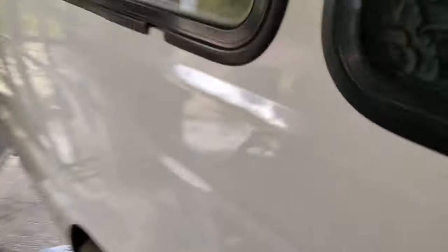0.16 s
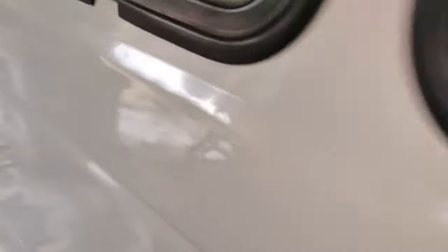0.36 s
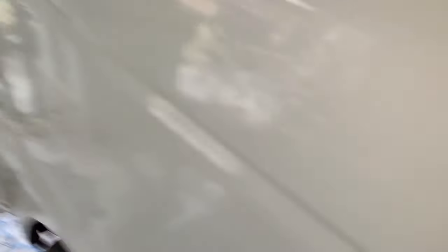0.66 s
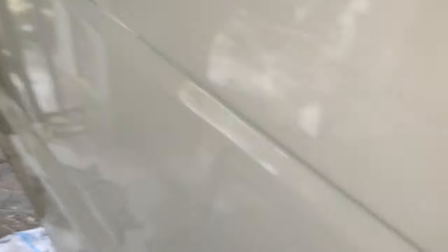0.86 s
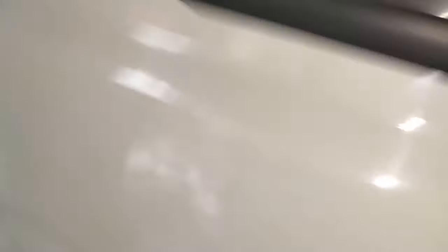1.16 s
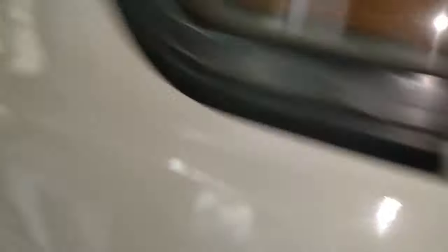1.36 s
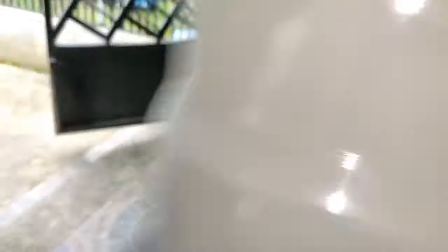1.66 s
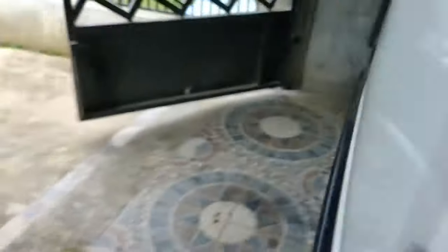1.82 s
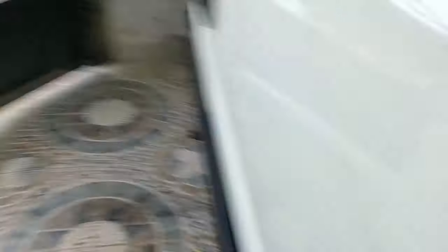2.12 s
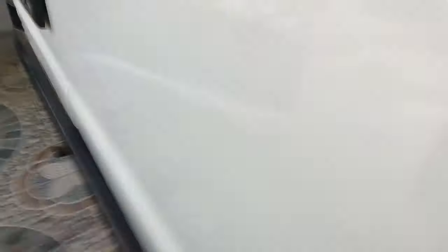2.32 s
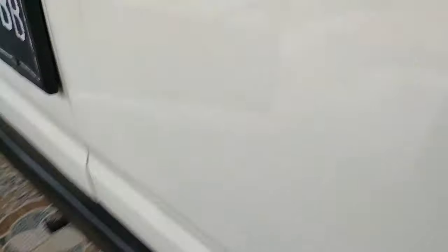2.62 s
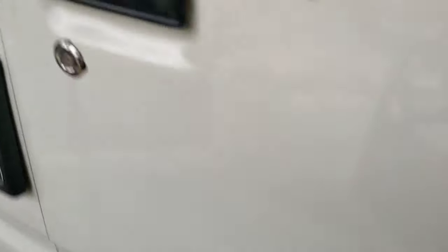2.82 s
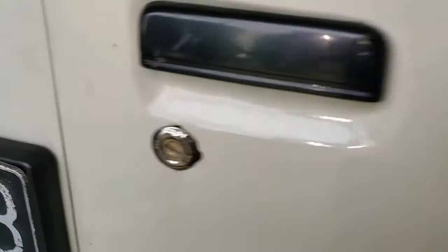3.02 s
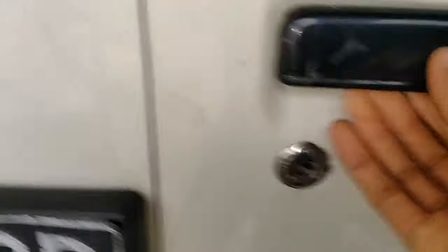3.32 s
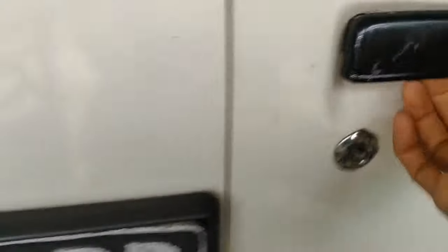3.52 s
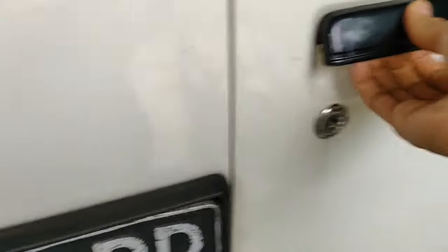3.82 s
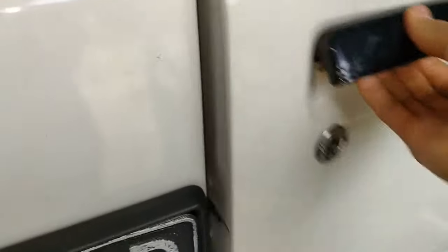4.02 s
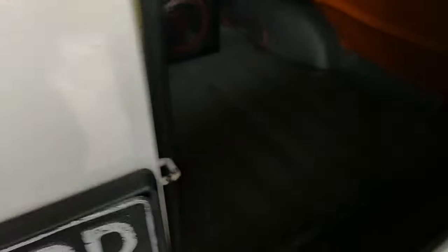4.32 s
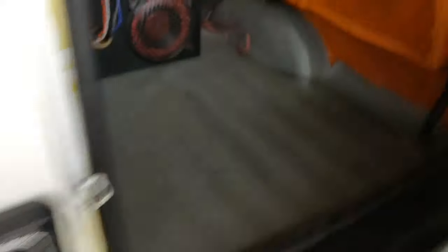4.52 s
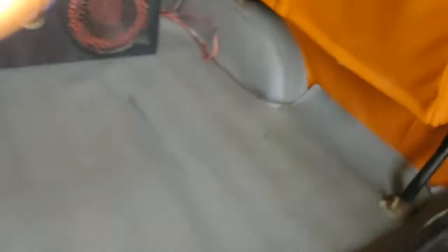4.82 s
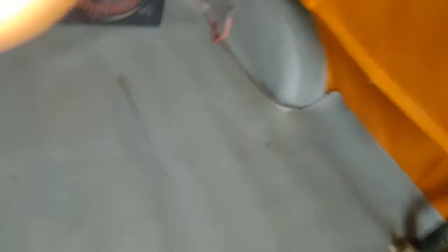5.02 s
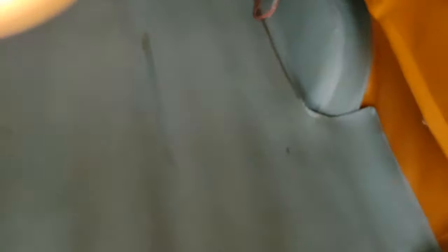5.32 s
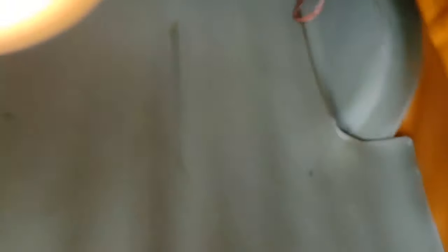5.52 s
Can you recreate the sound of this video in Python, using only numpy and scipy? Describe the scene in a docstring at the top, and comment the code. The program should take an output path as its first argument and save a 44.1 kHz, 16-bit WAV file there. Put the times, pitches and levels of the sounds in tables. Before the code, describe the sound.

A van door swings and slams in a carport, its lock clattering and its metal panel booming. Soft footsteps scuff along while fingers tap the hand-held microphone. The rear hatch handle rattles, the latch lets go with a very loud, close clack, and the hatch rises with a faint rub and a knock. An insect chirps faintly over a low outdoor hum.

```python
"""Over a low outdoor hum and a chirping insect, a van door swings and slams in a tiled carport:
the lock clatters, the steel skin booms and a loose panel shudders. Someone scuffs round to the rear
with a hand-held camera, fingers tapping its shell. The hatch handle rattles, then the latch lets go
close enough to overload the microphone. A finger judders on the shell while the hatch slides up
on its rubbing strut and knocks against its stop."""
import sys
import numpy as np
from scipy import signal
from scipy.fft import irfft, next_fast_len
from scipy.io import wavfile
from scipy.ndimage import uniform_filter1d, minimum_filter1d

SR = 44100
rng = np.random.default_rng(int(sys.argv[2]) if len(sys.argv) > 2 else 0)


def output_pcm(signal):
    """Save a mono or channel-first signal as 16-bit PCM at the path in sys.argv[1].

    Samples are clipped to [-1, 1] before scaling.
    """
    pcm = np.clip(np.atleast_2d(signal).T, -1, 1) * 32767
    wavfile.write(sys.argv[1], SR, np.round(pcm).astype(np.int16))


N = 249958
TIME = np.arange(N) / SR
CORNER_S = 2.18  # the camera is halfway round the rear corner of the van

# noise colours, dark to bright: (frequency [Hz], level [dB])
HUM = [(25, -36), (50, -23.5), (90, -10.5), (140, 1), (200, -3.5), (300, -6.5), (420, -13), (700, -52.5)]
WASH = [(180, -23), (320, 4), (480, 2.5), (680, -3.5), (900, -5), (1300, -23), (2500, -39)]
AIR = [(500, -15.5), (1000, 7.5), (1400, -1.5), (2100, 1), (3000, -4), (4600, -8), (6000, -4), (8000, -10)]
HISS = [(4500, -37.5), (6000, -15), (6700, 3), (7200, 5), (7700, -4), (8300, -29.5)]
# the bright tick of a light contact: (frequency [Hz], level [dB], t60 [s])
TAP_TICK = [(1140, -8.5, 0.0045), (2210, -14.5, 0.0046), (4200, -11.5, 0.0026), (7500, 1.5, 0.0032)]


def amp(db):
    """Decibels to gain."""
    return 10 ** (np.asarray(db) / 20)


def unit_rms(x):
    """Scales to rms 1."""
    return x / np.sqrt(np.mean(x ** 2) + 1e-20)


def curve(points, hz):
    """Interpolates (frequency [Hz], value) points on a log-frequency axis."""
    f, value = np.transpose(points)
    return np.interp(np.log(hz + 1), np.log(f + 1), value)


def panned(db):
    """Constant-power stereo gains; positive dB leans left."""
    return unit_rms(amp([[db / 2], [-db / 2]]))


def add(mix, s, sound):
    """Adds a sound to the mix at time s."""
    part = mix[:, round(s * SR):][:, :sound.shape[-1]]
    part += sound[..., :part.shape[1]]


def wander(samples):
    """Random drift of rms 1, smoothed over this many samples."""
    return unit_rms(uniform_filter1d(rng.standard_normal(N), size=samples))


def strokes(rows, attack, release):
    """Envelope for (time [s], length [s], level [dB]) rows: each rises, holds and dies away."""
    return sum(amp(db) * np.clip((TIME - s) / attack, 0, 1)
               * np.exp(-np.maximum(TIME - s - length, 0) / release) for s, length, db in rows)


def soften(x, rise):
    """Rounds off an attack, as when vibration spreads over a panel."""
    return x * (1 - np.exp(-np.arange(x.shape[-1]) / SR / rise))


def stereo_spectra(size):
    """Noise spectra for two microphones, alike in the bass and nearly unrelated in the treble."""
    # likeness of the two sides: (frequency [Hz], correlation [0-1])
    likeness = [(100, 1), (400, 0.75), (750, 0.36), (1200, 0.047), (3000, 0.033), (8000, 0.12)]
    hz = np.fft.rfftfreq(size, 1 / SR)
    mid, side = np.exp(2j * np.pi * rng.random((2, len(hz))))
    same = curve(likeness, hz)
    mid, side = mid * np.sqrt(1 + same), side * np.sqrt(1 - same)
    return hz, np.array([mid + side, mid - side])


def noise(colour):
    """Steady stereo noise of a given colour."""
    hz, spectra = stereo_spectra(next_fast_len(N, True))
    return unit_rms(irfft(spectra * amp(curve(colour, hz)))[:, :N])


def resonant(peaks):
    """Steady stereo noise in a few resonances."""
    hz, spectra = stereo_spectra(next_fast_len(N, True))
    shape = sum(amp(db) / (1 + ((hz - centre) / width) ** 2) for centre, width, db in peaks)
    return unit_rms(irfft(spectra * shape)[:, :N])


def bands(rows, size):
    """Overlapping bands of noise, each dying at its own speed."""
    hz, spectra = stereo_spectra(size)
    t = np.arange(size) / SR
    edges = np.log([rows[0][0] / 2] + [row[0] for row in rows] + [rows[-1][0] * np.sqrt(2)])
    for k, (_, db, t60) in enumerate(rows):
        share = np.interp(np.log(hz + 1), edges[k:k + 3], [0, 1, 0])
        yield db, unit_rms(irfft(spectra * share)) * np.exp(-np.log(1000) * t / t60)


def burst(rows, size=32768):
    """A blow on something with too many modes to tell apart."""
    return sum(amp(db) * band for db, band in bands(rows, size))


def ring(modes, size=32768):
    """A blow on a few distinct modes."""
    t = np.arange(size) / SR
    return sum((-1) ** k * amp(db) * np.exp(-np.log(1000) * t / t60) * np.sin(2 * np.pi * hz * t)
               for k, (hz, db, t60) in enumerate(modes))


def walk(beside_db, behind_db, open_db, corner_takes_s=0.98, open_s=4.3, open_takes_s=0.39):
    """Gain that glides from beside the van to behind it, then to the open hatch."""
    rounded = .5 + .5 * np.tanh(2 * (TIME - CORNER_S) / corner_takes_s)
    ajar = .5 + .5 * np.tanh(2 * (TIME - open_s) / open_takes_s)
    return amp(beside_db + (behind_db - beside_db) * rounded + (open_db - behind_db) * ajar)


def ambience(flicker_db=2.0):
    """Outdoor hum, wash and flickering hiss, booming in the hollows behind and inside the van."""
    # air resonances behind and inside the van: (frequency [Hz], half-width [Hz], level [dB])
    hollow_peaks = [(134, 33, 3), (179, 50, -7), (390, 25, -26.5), (615, 30, -19)]
    load_space_peaks = [(300, 12, -3), (445, 12, -3.5), (660, 47, 1)]
    flicker = amp(flicker_db * wander(2500))
    hum = noise(HUM) * walk(-55.5, -54.5, -57)
    wash = noise(WASH) * walk(-73, -60.5, -58)
    air = noise(AIR) * walk(-73.5, -75, -72)
    hiss = noise(HISS) * walk(-65, -73, -72) * flicker
    hollow = resonant(hollow_peaks) * walk(-66, -47, -49.5)
    load_space = resonant(load_space_peaks) * walk(-83.5, -67, -59)
    lean_left = walk(3.5, 0.5, 1) ** np.array([[.5], [-.5]])
    return (hum + wash + air + hiss + hollow + load_space) * lean_left


def carport(x):
    """Diffuse echo from the roof, walls and tiles."""
    # reverb bands: (frequency [Hz], energy [dB], t60 [s])
    decays = [(120, -34, 1), (388, -30, 0.31), (900, -27.5, .85), (2200, -18, 0.47), (6500, -18.5, 0.43)]
    tail = sum(amp(db) * band / np.linalg.norm(band[0]) for db, band in bands(decays, size=32768))
    return signal.oaconvolve(x, soften(tail, rise=0.0068), axes=1)[:, :N]


def insect(gap_s=.085, blur_s=.075, glide_s=0.015, top_hz=7550, bottom_hz=6850):
    """An insect chirps in bouts and trills once; a chirp is two falling whistles in a blur of echo."""
    # bouts of chirps, and the steady trill: (time [s], length [s], level [dB])
    bouts = [(0.01, .08, -60), (0.252, 0.12, -66), (0.957, 0.15, -55.5), (1.209, 0.0096, -54.5),
             (1.368, 0.23, -54.5), (1.729, 0.093, -57), (1.956, .2, -56), (2.366, .01, -60),
             (2.556, .01, -60), (4.005, .01, -65.5)]
    trills = [(3.36, .5, -59)]
    # colour of the blur: (frequency [Hz], half-width [Hz], level [dB])
    blur_peaks = [(6900, 180, -4), (7433, 100, -3)]
    chirps = [(at, db) for s, span, db in bouts
              for at in np.linspace(s, s + span, 1 + round(span / gap_s))]
    blur, whistles = np.zeros((1, N)), np.zeros((2, N))
    fade, glide = np.arange(0, 1, 1 / (blur_s * SR)), np.arange(0, 1, 1 / (glide_s * SR))
    for s, db in chirps:
        start = max(s - glide_s, 0)
        add(blur, start, amp(db) * unit_rms(np.sqrt(fade) * (1 - fade)))
        for k in range(2):
            hz = (top_hz + (bottom_hz - top_hz) * glide) * rng.uniform(.97, 1.02)
            whistle = np.sin(np.pi * glide) * np.sin(2 * np.pi * np.cumsum(hz) / SR)
            add(whistles, start + k * glide_s, amp(db - .5 - 2.6 * k) * whistle)
    trill = noise(HISS) * strokes(trills, attack=0.018, release=0.06)
    return panned(4) * (whistles + amp(-4) * resonant(blur_peaks) * blur) + trill


def footsteps():
    """Feet and clothes brush along as the camera is carried round the van."""
    # airy scuffs and soft, low footfalls: (time [s], length [s], level [dB])
    scuffs = [(0, 0.0077, -51.5), (.17, 0.14, -66.5), (.79, 0.1, -52.5), (1.257, 0.038, -66.5),
              (1.787, 0.13, -60.5), (2.02, 0.15, -61), (2.42, 0.18, -74.5), (2.99, 0.095, -61.5),
              (3.62, 0.13, -63.5)]
    footfalls = [(1.22, 0.12, -52), (2.33, 0.16, -50.5), (2.95, 0.15, -48)]
    return (panned(4) * noise(AIR) * strokes(scuffs, attack=0.0027, release=.085)
            + noise(HUM) * strokes(footfalls, attack=0.021, release=0.035))


def judder(slips_hz=112, unevenness=.3):
    """A finger sticks and slips unevenly on the camera shell beside the left microphone."""
    # finger drags: (time [s], length [s], level [dB]); a negative length starts already faded
    drags = [(4.39, 0.74, -43.5), (4.675, -0.1254, -25)]
    # what each slip shakes: (frequency [Hz], level [dB], t60 [s])
    modes = [(117, 1, 0.035), (229, -2, 0.025), (328, -8.5, 0.027)]
    turns = np.cumsum(slips_hz * np.exp(unevenness * wander(400))) / SR
    slips = np.diff(np.floor(turns), prepend=0)
    groan = unit_rms(signal.oaconvolve(slips - slips.mean(), ring(modes, size=4096))[:N])
    return panned(12) * groan * strokes(drags, attack=0.024, release=0.019)


def fingers(low_cut_hz=170, firm_tap_db=-14, octaves_per_db=0.32):
    """Damped taps and rubs on the camera shell, mostly on the right; softer taps sound lower."""
    # a sliding fingertip: (time [s], length [s], level [dB]); its colour: (frequency [Hz], level [dB])
    rubs = [(2.645, 0.04, -48.5), (2.715, 0.047, -48), (2.84, 0.092, -57.5)]
    rub_colour = [(300, -26), (1000, 3), (3000, -7.5), (5000, -8), (7300, -0.5), (8200, -4)]
    # finger taps: (time [s], thud [dB], t60 [s], tick [dB], pan [dB])
    taps = [(2.6499, -15.5, 0.005, -36.5, -36), (2.7194, -15.5, 0.0044, -36, -35),
            (2.761, -27, .008, -47, -23), (2.79, -23, 0.022, -61, -25), (2.921, -17.5, 0.0046, -47, -40),
            (3.039, -28, 0.013, -25, -18), (3.059, -22, 0.032, -40, 11), (3.066, -12.5, 0.0097, -33, -9.5),
            (3.0769, -14.5, 0.019, -60, -37), (3.0872, -15.5, 0.014, -43, -30),
            (5.247, -22.5, 0.013, -28.5, -4.5)]
    # the shell under a firm tap: (frequency [Hz], level [dB])
    shell_modes = [(565, 2), (1000, -11.5)]
    out = panned(-13.5) * noise(rub_colour) * strokes(rubs, attack=0.0051, release=0.029)
    for s, thud_db, t60, tick_db, pan_db in taps:
        pitch = 2 ** (octaves_per_db * (thud_db - firm_tap_db))
        thud = ring([(hz * pitch, db, t60) for hz, db in shell_modes], size=4096)
        add(out, s, panned(pan_db) * (amp(tick_db) * burst(TAP_TICK, size=4096) - amp(thud_db) * thud))
    return signal.sosfilt(signal.butter(2, low_cut_hz, "highpass", fs=SR, output="sos"), out)


def door_swing(moan_s=.1, moan_hz=300, rise_hz_per_s=85, waver=0.0056):
    """The door swings with a swish and a faint rising moan, pushing air ahead of it."""
    hz = (moan_hz + rise_hz_per_s * (TIME - moan_s)) * (1 + waver * wander(600))
    phase = 2 * np.pi * np.cumsum(hz) / SR
    tone = unit_rms(amp(1) * np.sin(phase) + amp(-9) * np.sin(2 * phase))
    moan = tone * strokes([(moan_s, .25, -52.5)], attack=0.01, release=.025)
    swish = noise(WASH) * strokes([(0, 0.35, -54)], attack=0.004, release=0.053)
    pushed_air = noise(HUM) * strokes([(0.368, 0.617, -46)], attack=0.069, release=.09)
    return moan + swish + pushed_air


def strut(sag_per_s=0.26, flutter_db=2.0):
    """The strut rubs unevenly as it slides out, its resonances sinking."""
    # strokes of the rod: (time [s], length [s], level [dB])
    slides = [(4.965, 0.021, -60.5), (5.15, 0.072, -58), (5.24, 0.19, -68), (5.62, 0.019, -64.5)]
    # its resonances: (frequency [Hz], half-width [Hz], level [dB])
    peaks = [(2020, 130, -1.5), (2500, 140, -10), (3500, 360, -14), (4980, 590, -14.5)]
    speed = 1 + sag_per_s * np.clip(slides[2][0] - TIME, -.5, .5)  # sinks around the third stroke
    rub = np.array([np.interp(np.cumsum(speed) % N, np.arange(N), side) for side in resonant(peaks)])
    return rub * strokes(slides, attack=0.018, release=0.034) * amp(flutter_db * wander(400))


def linkage(detune=.06):
    """Small metal parts tick and knock on the hollow hatch; their modes shift from click to click."""
    # the hand dragging the handle out: (time [s], length [s], level [dB])
    pull = [(3.37, 0.32, -52)]
    # clicks of the linkage and the rising hatch: (time [s], knock [dB], tick [dB], pan [dB])
    clicks = [(1.102, -77, -51.5, 5), (3.306, -40.5, -58, -1), (3.403, -47.5, -46, 0),
              (3.423, -33, -52, -1), (3.468, -43.5, -33.5, 0), (3.472, -22.5, -29.5, 1),
              (3.651, -36, -57.5, -1.5), (3.681, -36, -43.5, 0), (3.757, -30, -50, -1.5),
              (3.783, -47, -39, 7.5), (3.786, -29, -34.5, -1.5), (3.847, -35, -63, 0.5),
              (4.308, -40.5, -42.5, -1), (4.406, -40, -38, -1.5), (4.554, -36.5, -44, 6.5),
              (4.636, -39.5, -46.5, 1.5), (5.151, -39, -45, 3)]
    # the handle's ring, the hollow knock, the metal tick: (frequency [Hz], level [dB], t60 [s])
    handle_modes = [(303.3, -4, 0.14), (537, -6.5, 0.2), (757, -4.5, 0.081), (895, -13, 0.11),
                    (1000, -15, .08), (1780, -25, 0.05), (3240, -27.5, 0.04)]
    knock_bands = [(140, -21, 0.14), (302, -11.5, 0.053), (710, -3, 0.16), (1150, -22.5, .08),
                   (1700, -24, .08)]
    tick_bands = [(1700, -14, .06), (3220, -15.5, 0.1), (4640, -9.5, 0.021), (6900, -4.5, 0.035)]
    # each part seats and bounces once: (delay [s], level [dB])
    chatter = [(0, -1.5), (.007, -17.5)]
    out = noise(WASH) * strokes(pull, attack=.03, release=0.061)
    for s, knock_db, tick_db, pan_db in clicks:
        modes = [(hz * np.exp(detune * rng.standard_normal()), db, t60) for hz, db, t60 in handle_modes]
        knock = amp(-3.5) * burst(knock_bands, size=8192) + amp(-2) * ring(modes, size=8192)
        contact = amp(knock_db) * burst([(700, -6, 0.016), (2000, -16, 0.0068)], size=2048)
        tick = burst(tick_bands, size=2048) + amp(-1.5) * burst(TAP_TICK, size=2048)
        add(out, s, panned(pan_db) * amp(knock_db) * knock)
        for delay, db in chatter:
            add(out, s + delay, panned(pan_db) * amp(db) * (contact + amp(tick_db) * tick))
    return out


def hatch_stop():
    """The rising hatch meets its stop with a quick double knock."""
    # the knocks: (time [s], level [dB])
    blows = [(5.047, -3.5), (5.052, -1)]
    # the hatch's dense ringing and its distinct modes: (frequency [Hz], level [dB], t60 [s])
    ringing = [(139, -36, 0.22), (230, -32.5, 0.2), (560, -34, 0.15), (920, -36, 0.14), (1520, -44.5, 0.12),
               (3800, -50.5, 0.16), (7200, -43, 0.34)]
    modes = [(205, -32.5, 0.37), (230, -34.5, 0.45), (576, -30, 0.086), (1650, -49, 0.13),
             (6900, -40.5, 0.1)]
    out = np.zeros((2, N))
    for s, db in blows:
        knock = amp(-2.0) * burst(ringing) + amp(-1.5) * ring(modes)
        add(out, s, amp(db) * soften(knock, rise=0.0003))
    return out


def low_swells(pitch_sag=0.067, door_lag_s=-0.000047, hatch_lag_s=0.000076):
    """Short low swells: flexing panels, pushed air, a finger bumping the camera shell on the left."""
    # a few sagging cycles each: (time [s], length [s], frequency [Hz], level [dB], pan [dB])
    swells = [(0.502, 0.015, 124, -10, 0), (.55, 0.025, 114, -6.5, 0.5), (0.656, 0.038, 98.3, -14, -2),
              (4.0505, 0.0058, 340, -14, -1), (4.0562, 0.022, 691.3, 3.5, 0), (4.06, 0.029, 160.3, -19, 1),
              (4.687, .05, 222.4, -33, 21), (4.788, 0.016, 137, -20, 30), (5.045, 0.0152, 206, -22, 2)]
    out = np.zeros((2, N))
    for s, length, hz, db, pan_db in swells:
        progress = np.arange(0, 1, 1 / (length * SR))
        turns = np.cumsum(hz * (1 + pitch_sag * (.5 - progress))) / SR
        left_lag = door_lag_s if s < CORNER_S else hatch_lag_s
        tone = np.sin(2 * np.pi * np.array([turns - hz * left_lag, turns]))
        add(out, s, panned(pan_db) * amp(db) * np.sin(np.pi * progress) ** 2 * tone)
    return out


def latch():
    """The pawl slips off the striker, shaking the hatch and the cabin behind it."""
    # blows of the latch: (time [s], panel [dB], snap [dB], cabin [dB])
    blows = [(4.05, -11.5, -23.5, -21.5), (4.057, -9.5, -4.5, -12), (4.059, 1, -2, 1),
             (4.062, -18.5, -10.5, -9), (4.076, -20, -22, -7)]
    # hatch panel, snapping pawl and ringing cabin: (frequency [Hz], level [dB], t60 [s])
    panel_modes = [(79, -30, 0.39), (170, -16.5, 0.26), (277, -26, .12), (308, -30.5, 0.35),
                   (367, -35.5, 0.62), (473, -20.5, 0.12), (657, -26, 0.35), (688, -24, 0.22),
                   (913, -45.5, 0.36), (1750, -40.5, 0.26), (1840, -40.5, 0.22)]
    snap_bands = [(640, -15, 0.1), (1230, -23.5, 0.044), (1840, -22.5, .07), (2830, -31.5, 0.025),
                  (4670, -20.5, 0.065), (7000, -18, 0.06)]
    cabin_bands = [(150, -33, 0.28), (400, -28.5, 0.41), (740, -28.5, .45), (1160, -52, 0.15),
                   (1900, -45, 0.14), (4000, -40.5, 0.17), (6900, -34.5, 0.27)]
    out = np.zeros((2, N))
    for s, panel_db, snap_db, cabin_db in blows:
        add(out, s, amp(panel_db) * ring(panel_modes))
        add(out, s, amp(snap_db) * panned(-1.6) * burst(snap_bands, size=8192))
        add(out, s, amp(cabin_db) * soften(burst(cabin_bands), rise=0.002))
    return out


def door_slam(landing_s=.5555):
    """The lock rattles over its striker, the door lands on the body, and a loose panel shudders."""
    # blows of the closing door: (time [s], body [dB], lock [dB])
    blows = [(0.501, -23, -10.5), (0.5134, -14, 1.5), (.522, -8.5, -1), (0.5548, 0, -2.5),
             (.572, -6.5, -10.5), (.6, -6.5, -15), (.925, -28.5, -27)]
    # knocks of the loose panel: (time [s], level [dB])
    shudders = [(.926, -0.5), (.942, 3)]
    # door skin, van body, lock and loose panel: (frequency [Hz], level [dB], t60 [s])
    skin_modes = [(57.7, -26.5, 0.29), (69.6, -32, 0.25), (101.4, -12.5, .33), (174.8, -16, 0.63),
                  (196.2, -18.5, 0.4), (224, -28, .4), (264.7, -15.5, 0.43), (326, -11.5, 0.37),
                  (402, -17.5, 0.29), (530, -24.5, 0.2), (577, -25.5, 0.17), (647, -23, 0.34),
                  (765, -30, 0.18), (907, -17, 0.19), (980, -27.5, .3)]
    body_bands = [(90, -14.5, 0.44), (190, -17.5, 0.38), (367.4, -18.5, 0.46), (692, -23.5, 0.33),
                  (1000, -30.5, 0.43), (1300, -38.5, 0.1)]
    lock_bands = [(474, -30, 0.39), (920, -25, .35), (1250, -39, 0.25), (1740, -30, 0.38),
                  (2880, -33.5, 0.39), (4440, -33.5, 0.21), (6500, -27, 0.37)]
    shudder_modes = [(214.2, -33.5, 0.37), (265, -36.5, 0.21), (739, -43, 0.1), (1560, -50, 0.098),
                     (1630, -53, 0.1)]
    out = np.zeros((2, N))
    add(out, landing_s, soften(ring(skin_modes), rise=0.012))
    for s, body_db, lock_db in blows:
        add(out, s, amp(body_db) * soften(burst(body_bands), rise=0.0011))
        add(out, s, amp(lock_db) * panned(5.1) * soften(burst(lock_bands), rise=0.0025))
    for s, db in shudders:
        add(out, s, amp(db) * soften(ring(shudder_modes), rise=0.0087))
    return out


def scene():
    """The mix: the slam is farthest and wettest; only it, the latch and the hardware feed the echo."""
    slam, release = door_slam(), latch()
    hardware = linkage() + strut() + hatch_stop()
    echo = carport(amp(-1.5) * slam + amp(-4.0) * release + amp(-3.5) * hardware)
    van = door_swing() + slam + release + hardware + echo
    return van + low_swells() + fingers() + judder() + footsteps() + ambience() + insect()


def record(dry, low_cut_hz=38, treble_edge_hz=7900, ceiling_db=2.04, top_hz=15400):
    """A narrow-band microphone, a fast limiter that lets peaks just clip, then a final low-pass."""
    lean = signal.sosfilt(signal.butter(2, low_cut_hz, "highpass", fs=SR, output="sos"), dry)
    treble_cut = signal.firwin(301, treble_edge_hz, window=("kaiser", 7), fs=SR)
    narrow = signal.oaconvolve(lean, treble_cut[None], "same")
    safe_gain = np.minimum(1, amp(ceiling_db) / (abs(narrow).max(0) + 1e-9))
    gain = uniform_filter1d(minimum_filter1d(safe_gain, size=61), size=61)
    clipped = np.clip(narrow * gain, -1, 1)
    top_cut = signal.firwin(255, top_hz, window=("kaiser", 9), fs=SR)
    return signal.oaconvolve(clipped, top_cut[None], "same")


dry = scene()
out = record(dry)
output_pcm(out)
```